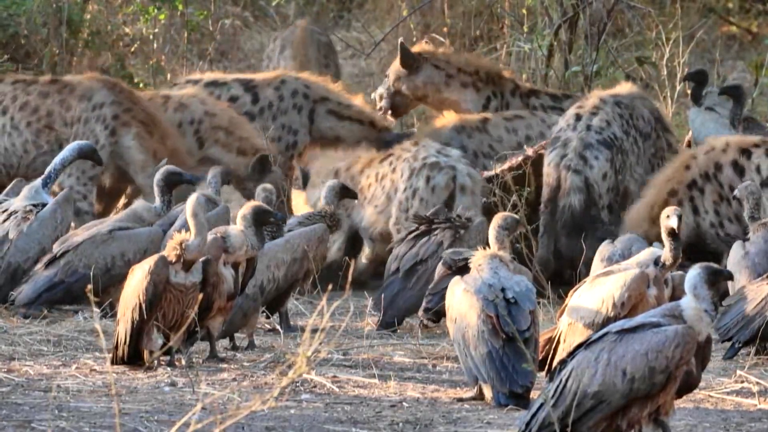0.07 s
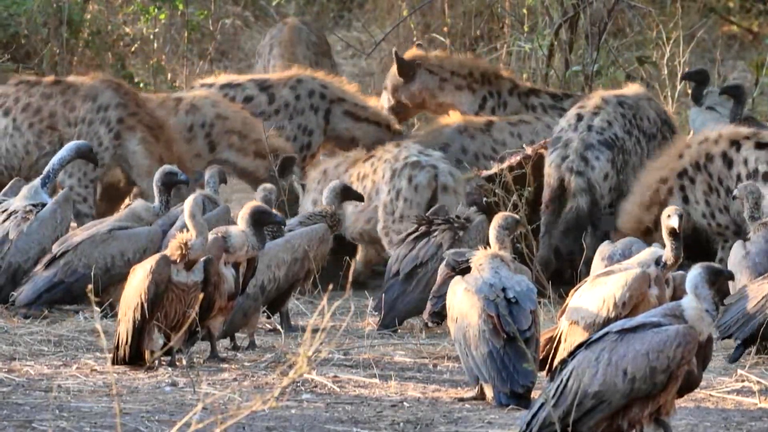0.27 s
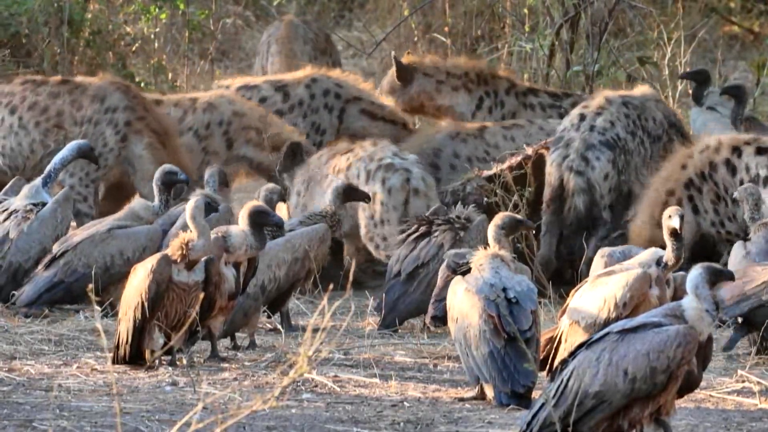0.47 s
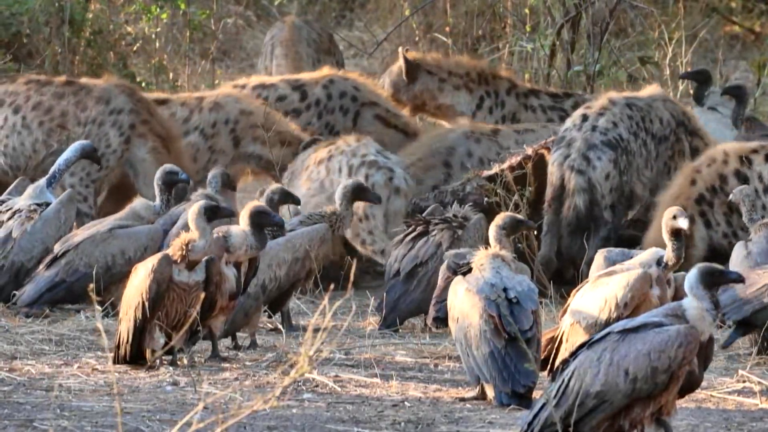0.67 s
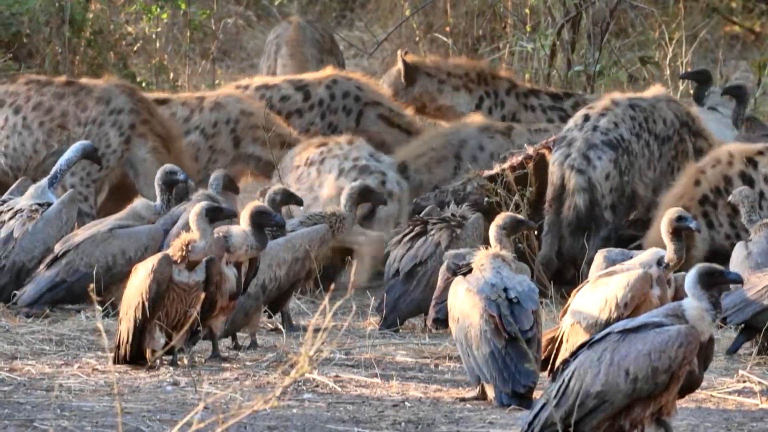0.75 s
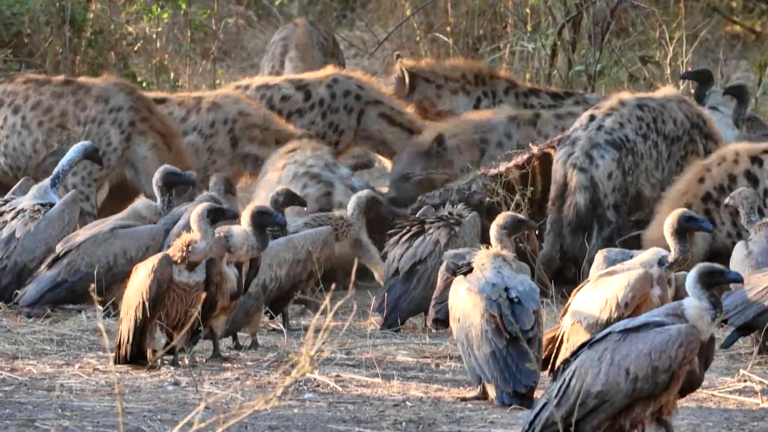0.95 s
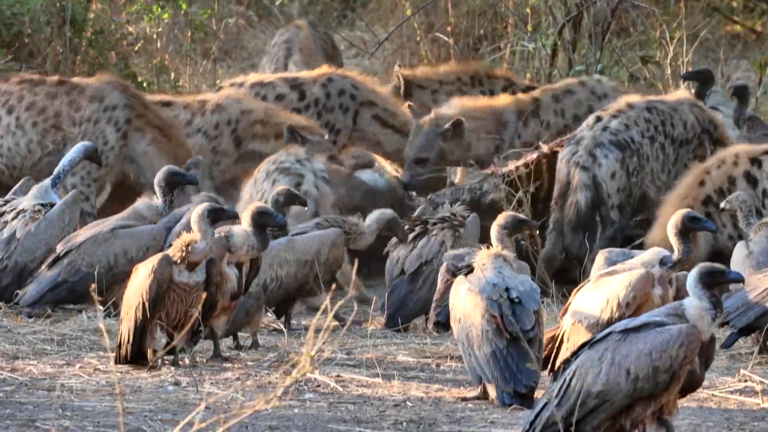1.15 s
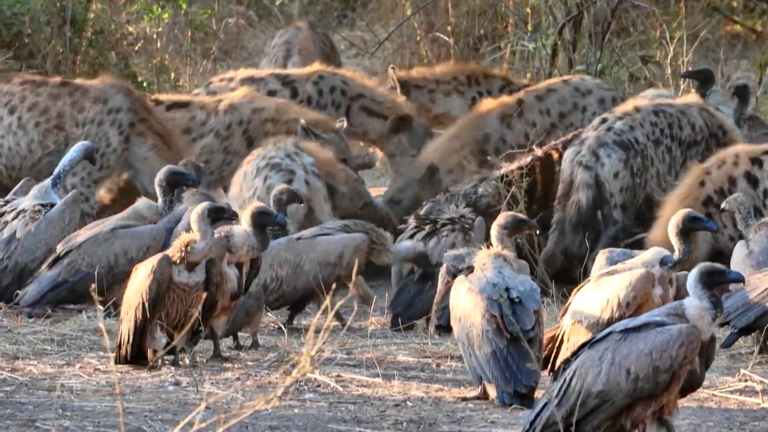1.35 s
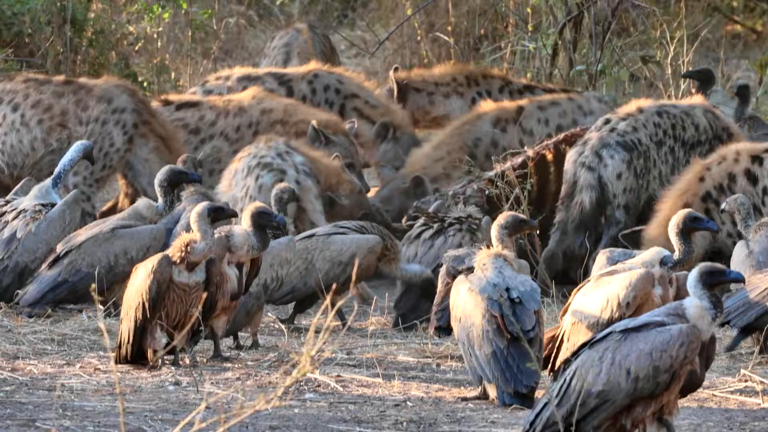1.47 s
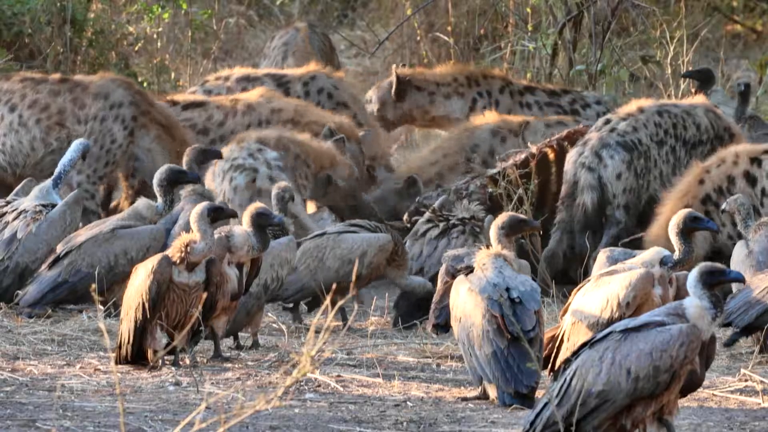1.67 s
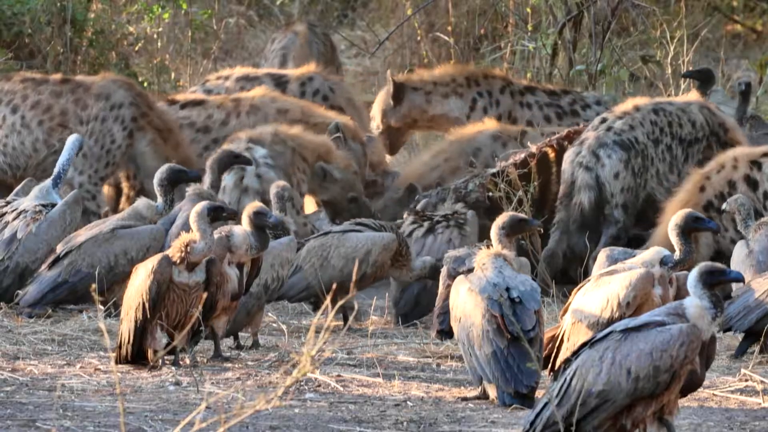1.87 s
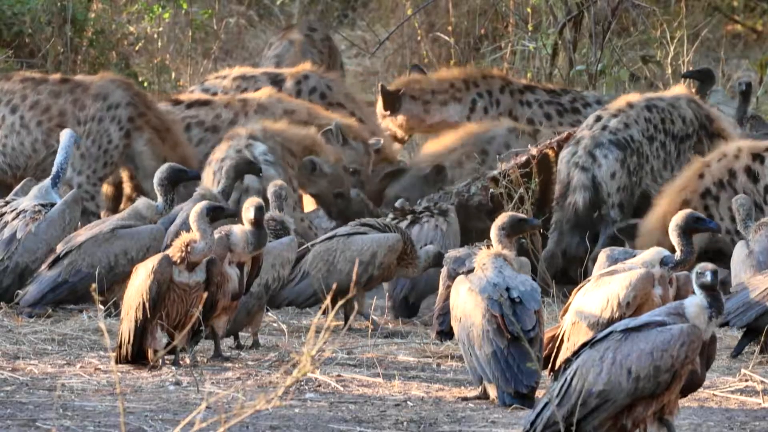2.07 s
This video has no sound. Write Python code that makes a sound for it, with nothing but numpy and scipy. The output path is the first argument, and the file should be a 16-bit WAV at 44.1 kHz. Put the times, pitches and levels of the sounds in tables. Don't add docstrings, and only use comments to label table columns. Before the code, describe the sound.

A hyena gives one long whoop, starting low and rough, climbing, breaking high around the middle, then sinking with soft echoes; faint insects, grass rustles, two bird chirps and a brief hiss, outdoors, single microphone.

```python
import sys
import numpy as np
from scipy import signal
from scipy.fft import rfft, irfft
from scipy.io import wavfile
from scipy.ndimage import uniform_filter1d

SR = 44100
rng = np.random.default_rng(int(sys.argv[2]) if len(sys.argv) > 2 else 0)


def dump_mix(stems):
    frames = np.atleast_2d(stems).T
    limited = np.clip(frames, -1, 1)
    pcm = np.round(limited * 32767).astype(np.int16)
    wavfile.write(sys.argv[1], SR, pcm)


def invert_db(x):
    u = np.asarray(x, float) / 20
    return 10 ** u


N = 92610
T = np.arange(N) / SR

# f/Hz, level per Hz/dB
BUSH_COLOUR = [(25, -44), (45, -13), (110, -9.5), (400, -8.5), (1400, -14), (3400, -21), (9000, -23.5),
               (15800, -34.5)]
BUSH_DB = -53

# f/Hz, waver/Hz, level/dB, throb/dB
INSECTS = [
    (9060, 32, -61, 2.0),
    (7180, 15, -69.5, -1),
]

# t/s, length/s, f/Hz, level/dB
GRUMBLES = [
    (.55, 0.9, 100, -60),
    (1.47, .25, 125, -63),
]

# t/s, length/s, level/dB, f/Hz
RUSTLES = [
    (.003, 0.058, -58.5, 6940),
    (0.036, 0.032, -50.5, 4670),
    (0.17, 0.011, -56, 3020),
    (1.033, 0.06, -54.5, 3500),
    (1.195, .012, -55, 3000),
    (1.231, 0.0092, -52, 3200),
    (1.595, 0.058, -54.5, 4700),
    (1.798, 0.0047, -45, 3000),
    (2.078, 0.0091, -51, 5000),
]

# t/s, level/dB
HISS_LEVEL = [
    (1.7, -85),
    (1.712, -56),
    (1.73, -44),
    (1.76, -46.5),
    (1.785, -46),
    (1.81, -49.5),
    (1.85, -56.5),
    (1.9, -72),
]
# f/Hz, level per Hz/dB
HISS_COLOUR = [(2500, -20), (4500, 0.5), (6500, 6.5), (8800, 14), (11000, -3.5), (13000, -5),
               (16000, -45.5)]

# t/s, rise/s, top f/Hz, peak level/dB, time to ring down by 60 dB/s
CHIRPS = [
    (1.079, 0.026, 6850, -43.5, 0.22),
    (1.908, 0.034, 6900, -43, 0.12),
]
CHIRP_START_HZ, CHIRP_SAG_HZ = 5800, 26.3

# t/s, pulse rate f/Hz, level/dB
WHOOP = [(.04, 197.6, -54.5), (.14, 224.3, -50), (.2, 236.7, -34), (.28, 257, -26.5), (.555, 307.5, -29),
         (.59, 338.4, -25.5), (.8, 363.3, -20), (1.0, 381.8, -21), (1.09, 417.5, -20.5),
         (1.165, 512.4, -26.5), (1.25, 529.7, -21), (1.325, 516.8, -23.5), (1.385, 439, -23),
         (1.45, 391, -19.5), (1.56, 351.7, -25.5), (1.75, 304.7, -31.5), (1.95, 249.7, -36.5),
         (2.08, 229.7, -50)]
# t/s, weak-pulse lines level/dB, mouth opening/factor, nose level/dB,
# second resonance level/dB, top resonances level/dB
MOUTH = [(.04, -16.5, 0.77, 0.5, -4.5, 1.5), (.3, 3.5, 0.91, -29, 2.3, -4.5), (.53, 2.5, 0.91, -9, 1, -1),
         (.61, -6, 0.95, -18.5, 2.5, 5.5), (1.0, -4, 1.105, -3, -11, -2.5), (1.15, 3.6, 1.02, 15, 5.5, 5.5),
         (1.23, -27, 1.355, 3, -4.5, 17.5), (1.33, -47, 1.17, 20, 18, -1),
         (1.45, -28, 1.068, -10, -8.5, 11.5), (1.8, -34, 0.97, 2, 2, -9), (2.05, -42, 0.84, -8, -1, 1.5)]
# f/Hz, width/Hz, level/dB
THROAT = [
    (397.5, 132, 5.5),
    (578, 77, -5),
    (756.4, 112.5, -2),
    (815, 130, -17.5),
    (1056, 48, -28.5),
    (1180, 67, -17),
    (1280.4, 96, -21),
    (1828, 330, -39.5),
    (201.5, 134, -32.5),
]
SKIRT = 2.73
CHEST_CUT_HZ, LIP_CUT_HZ = 72, 2300
WAVER_S, WAVER_LENGTH_S, WAVER_DB, WAVER_HZ, WAVER_WANDER_HZ = 1.09, 0.22, -11, 99.75, 12.08
JITTER, BREAK_JITTER = 0.002, 0.0052
SHIMMER_DB, PATCHY_DB = 1.28, 2.5
BREATH_DB = -28
PALATE_HZ, PALATE_WIDTH_HZ, PALATE_DB = 3417, 130, -46.5
STEP = 32

SCATTER_T60_S, SCATTER_DB, SCATTER_CUT_HZ = 0.82, -8.5, 12000
CUTOFF_HZ = 15800


def rms_one(x):
    return x / np.sqrt(np.mean(x ** 2) + 1e-20)


def in_time(rows):
    s, *columns = np.transpose(rows)
    return [np.interp(T, s, c) for c in columns]


def frequencies():
    return np.maximum(np.fft.rfftfreq(N, 1 / SR), 1)


def shaped_noise(gain):
    return rms_one(irfft(rfft(rng.standard_normal(N)) * gain, N))


def coloured(points):
    hz, db = np.transpose(points)
    return shaped_noise(invert_db(np.interp(np.log(frequencies()), np.log(hz), db)))


def drift(rate_hz):
    r = np.exp(-2 * np.pi * rate_hz / SR)
    slow = signal.lfilter([1], [1, -2 * r, r * r], rng.standard_normal(N + SR))[SR:]
    return rms_one(slow - slow.mean())


def resonate(x, hz, width_hz):
    r = np.exp(-np.pi * width_hz / SR)
    back = [1, -2 * r * np.cos(2 * np.pi * hz / SR), r * r]
    return signal.lfilter([(1 - r * r) / 2, 0, (r * r - 1) / 2], back, x)


def resonate_twice(x, hz, width_hz):
    return rms_one(resonate(resonate(x, hz, width_hz), hz, width_hz))


def bump(start, length):
    return np.sin(np.pi * np.clip((T - start) / length, 0, 1)) ** 2


def sing(hz):
    return 2 * np.pi * np.cumsum(hz) / SR


def scatter(x, db):
    t = T[:SR]
    tail = rng.standard_normal(SR) * invert_db(-60 * t / SCATTER_T60_S) * np.clip(t / 0.036, 0, 1)
    return invert_db(db) * signal.fftconvolve(x, tail / np.sqrt(np.sum(tail ** 2)))[:N]


def bush():
    return invert_db(BUSH_DB) * coloured(BUSH_COLOUR)


def insects():
    out = 0
    for hz, waver_hz, db, throb_db in INSECTS:
        pitch = hz + waver_hz * (drift(6) + 2 * drift(300))
        out = out + invert_db(db + throb_db * drift(20)) * np.sin(sing(pitch))
    return out


def grumbles():
    out = 0
    for s, length, hz, db in GRUMBLES:
        out = out + invert_db(db) * bump(s, length) * resonate_twice(rng.standard_normal(N), hz, 0.2 * hz)
    return out


def rustles():
    crackle = rng.standard_normal(N) * invert_db(4 * drift(900))
    out = 0
    for s, length, db, hz in RUSTLES:
        out = out + invert_db(db) * bump(s, length) * resonate_twice(crackle, hz, 1.2 * hz)
    return out


def hiss():
    level_db, = in_time(HISS_LEVEL)
    return invert_db(level_db + 0.94 * drift(60)) * coloured(HISS_COLOUR)


def bird():
    out = 0
    for k, (s, rise, top_hz, db, t60) in enumerate(CHIRPS):
        t = np.maximum(T - s, 0)
        climb = (top_hz - CHIRP_START_HZ) * np.sin(np.pi / 2 * np.minimum(t / rise, 1))
        sag = CHIRP_SAG_HZ * (1 + 12 * k) * np.clip(t / rise - 1, 0, 1)
        hz = CHIRP_START_HZ + climb - sag
        shape = np.minimum(t / rise, 1) ** 0.69 * invert_db(-60 * np.maximum(t - rise, 0) / t60)
        out = out + invert_db(db + 4 * drift(90)) * shape * np.sin(sing(hz + 40 * drift(200)))
    return out + scatter(out, db=-11)


def throat(hz, mouth, nasal_db, second_db, top_db):
    gain, lag = 0, 0
    trims = [0, nasal_db, second_db, second_db] + [top_db] * 4 + [0]
    for k, (centre, width, db) in enumerate(THROAT):
        centre = centre * mouth if k == 0 else centre
        off = (hz - centre ** 2 / hz) / width
        gain = gain + invert_db(db + trims[k]) / (1 + abs(off) ** SKIRT)
        lag = lag + np.arctan(off)
    return gain * np.exp(-1j * lag) / (1 + (CHEST_CUT_HZ / hz) ** 4) / (1 + (hz / LIP_CUT_HZ) ** 8)


def breath():
    air = shaped_noise(abs(throat(frequencies(), 1.1, 0, 0, 0)) ** .75)
    ring = rms_one(resonate(rng.standard_normal(N), PALATE_HZ, PALATE_WIDTH_HZ))
    return invert_db(BREATH_DB) * air + ring * invert_db(PALATE_DB + 3.45 * drift(23))


def whoop():
    curves = in_time(WHOOP) + in_time(MOUTH)
    rate, level_db, half_db, *shape = [uniform_filter1d(c, size=600) for c in curves]
    rate = rate * (1 + JITTER * drift(25) + BREAK_JITTER * bump(WAVER_S, 0.087) * drift(69))
    flutter = WAVER_HZ + WAVER_WANDER_HZ * drift(31.3)
    waver = invert_db(WAVER_DB) * bump(WAVER_S, WAVER_LENGTH_S) ** 0.26
    lines = [(k * rate / 2, invert_db(half_db) if k % 2 else 1) for k in range(1, 22)]
    lines += [(k * rate + m * flutter, waver) for k in (1, 2) for m in (-1, 1, 2, 3)]
    tone, power = 0, 0
    for hz, strength in lines:
        gain = np.interp(T, T[::STEP], throat(hz[::STEP], *[c[::STEP] for c in shape]))
        flicker_db = PATCHY_DB * min(hz[0] / 400, 1.5) * (drift(5.5) + 0.61 * drift(27))
        partial = gain * strength * invert_db(flicker_db)
        tone = tone + np.real(partial * np.exp(1j * sing(hz)))
        power = power + abs(partial) ** 2 / 2
    start = np.clip((T - WHOOP[0][0]) / 0.0046, 0, 1)
    end = np.clip((WHOOP[-1][0] - T) / 0.015, 0, 1)
    loudness = start * end * invert_db(level_db + SHIMMER_DB * drift(5))
    return loudness * (tone / np.sqrt(power) + breath())


def scene():
    voice = whoop()
    dull = signal.sosfilt(signal.butter(1, SCATTER_CUT_HZ, fs=SR, output="sos"), voice)
    call = voice + scatter(dull, db=SCATTER_DB)
    return (bush() + insects() + grumbles() + rustles() + hiss() + bird() + call)[None]


def top_cut(x):
    return signal.sosfilt(signal.butter(12, 15890, fs=SR, output="sos"), x)


def record(dry):
    mix = signal.sosfilt(signal.cheby2(24, 50, CUTOFF_HZ, fs=SR, output="sos"), dry)
    return top_cut(mix)


dry = scene()
out = record(dry)
dump_mix(out)
```